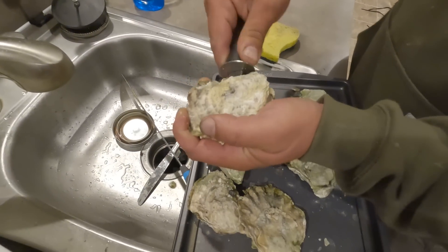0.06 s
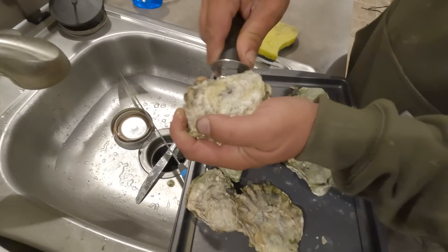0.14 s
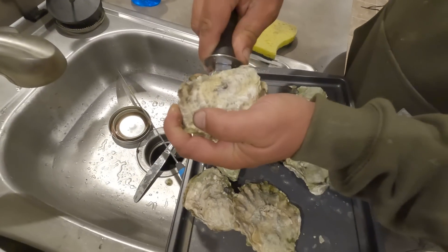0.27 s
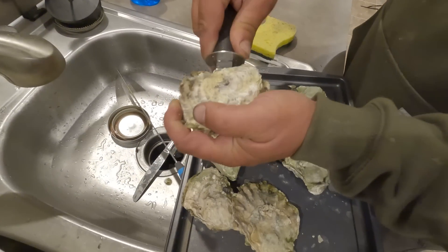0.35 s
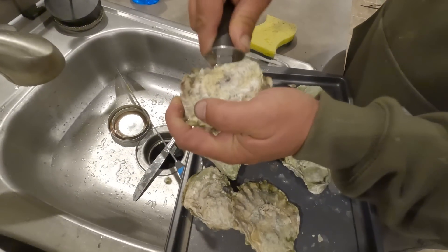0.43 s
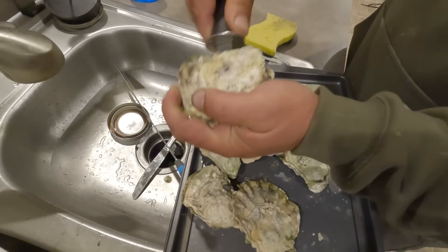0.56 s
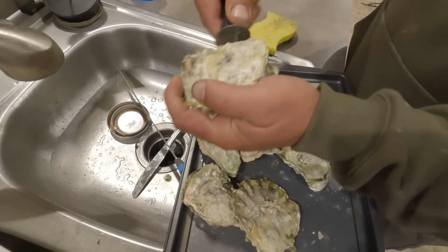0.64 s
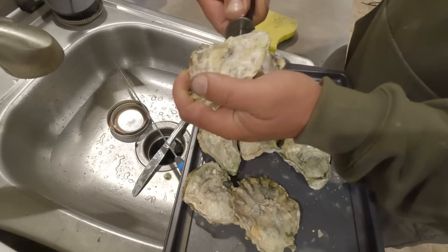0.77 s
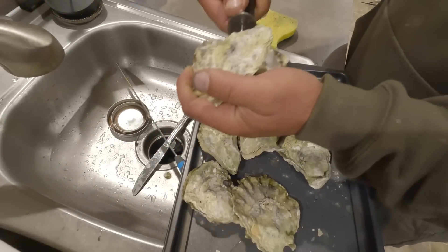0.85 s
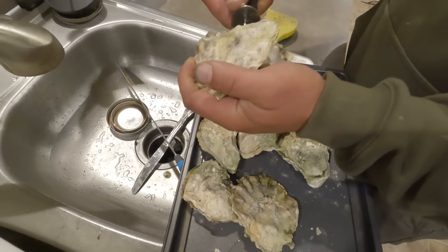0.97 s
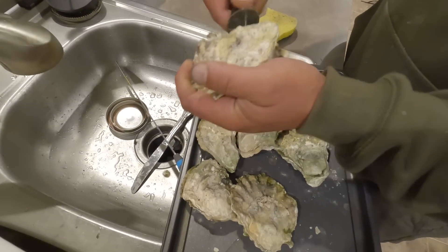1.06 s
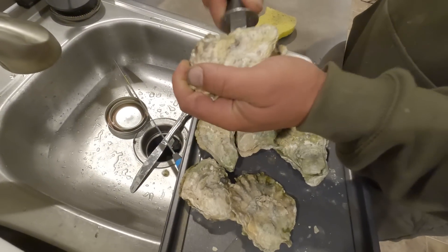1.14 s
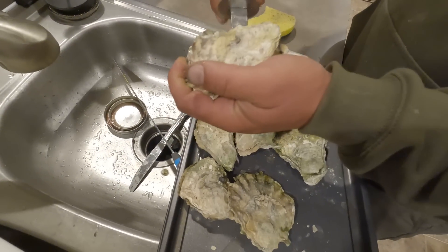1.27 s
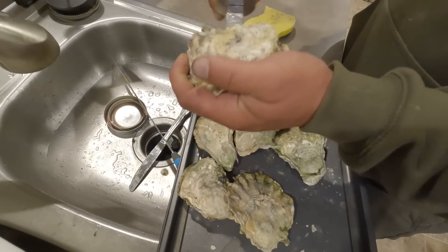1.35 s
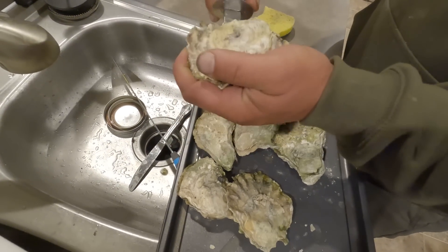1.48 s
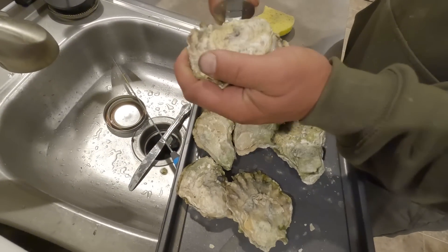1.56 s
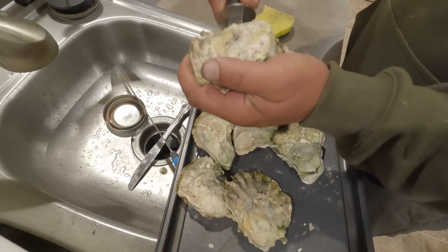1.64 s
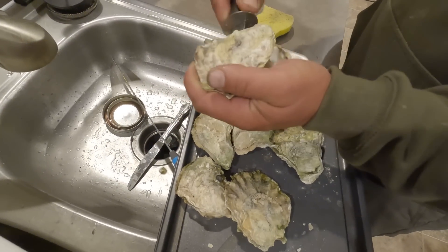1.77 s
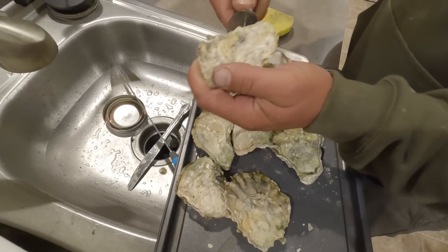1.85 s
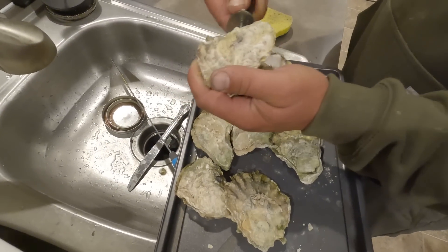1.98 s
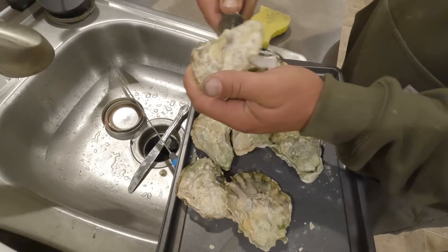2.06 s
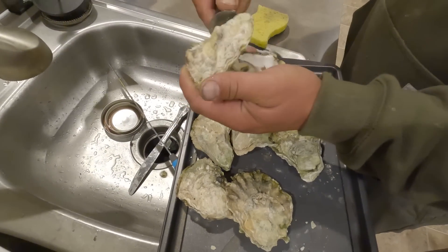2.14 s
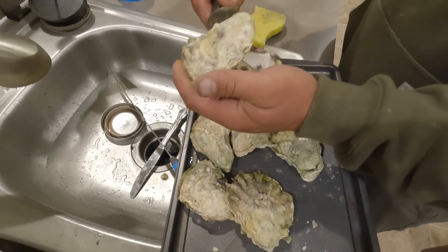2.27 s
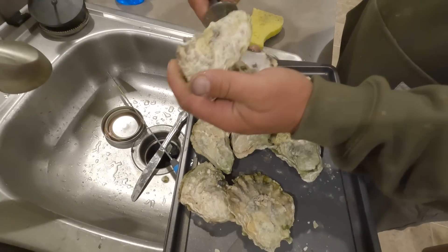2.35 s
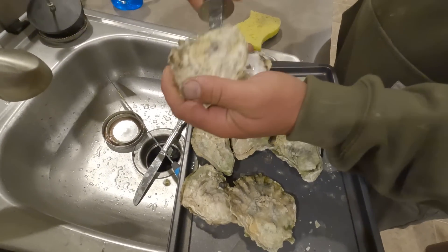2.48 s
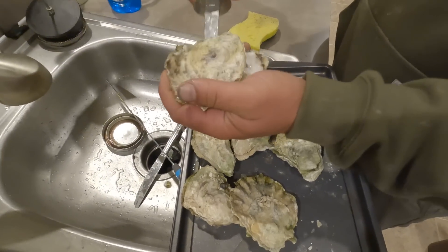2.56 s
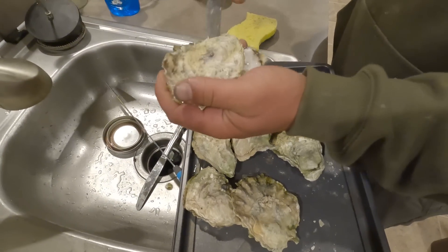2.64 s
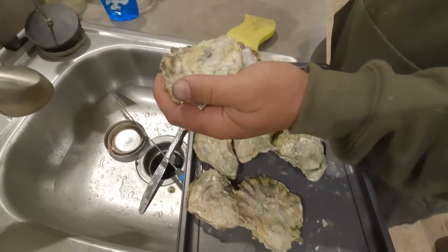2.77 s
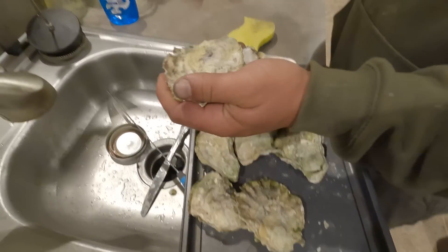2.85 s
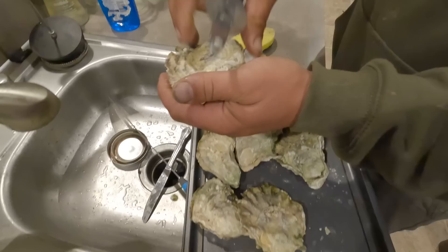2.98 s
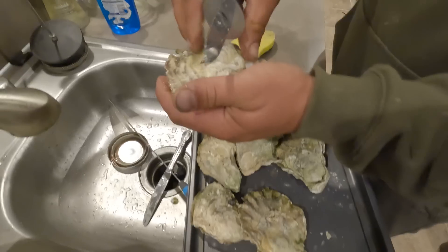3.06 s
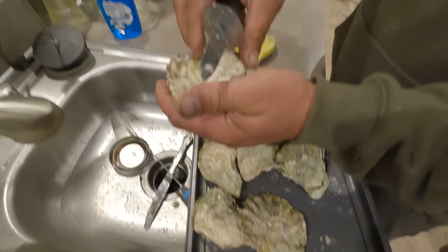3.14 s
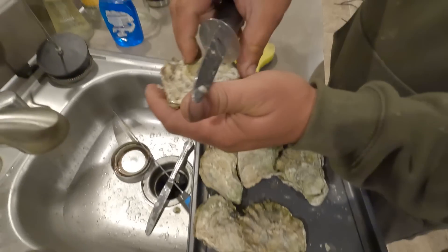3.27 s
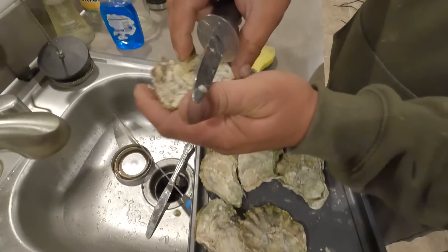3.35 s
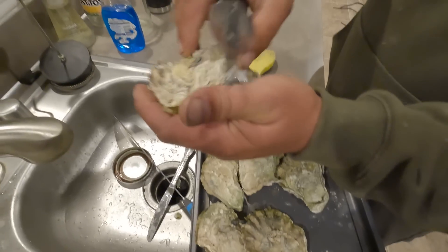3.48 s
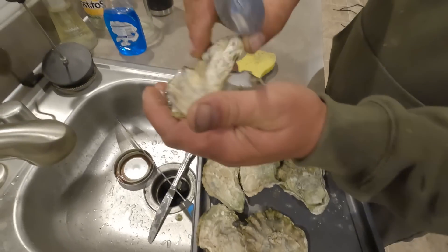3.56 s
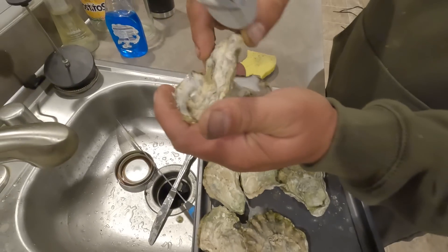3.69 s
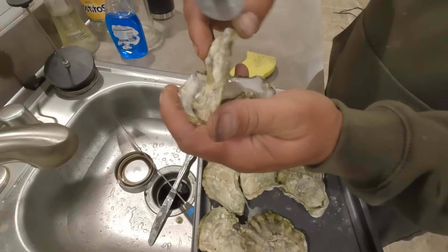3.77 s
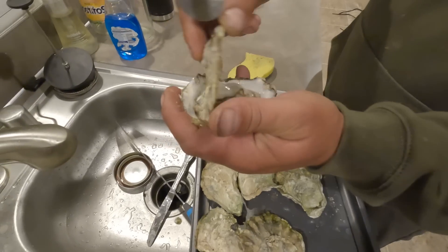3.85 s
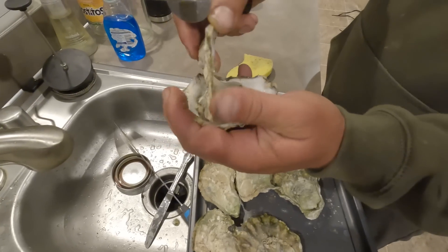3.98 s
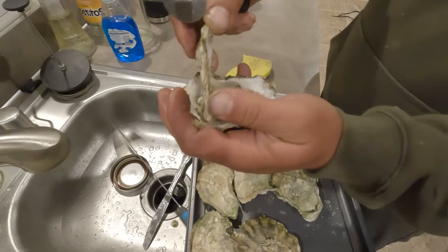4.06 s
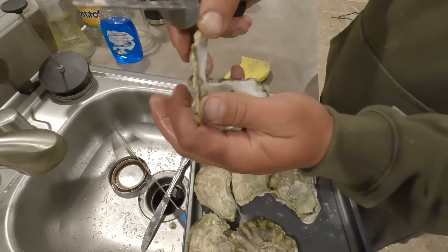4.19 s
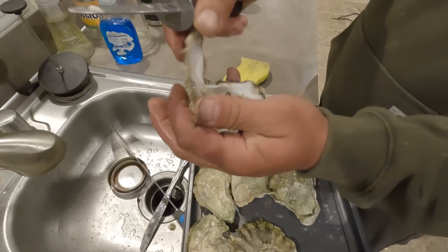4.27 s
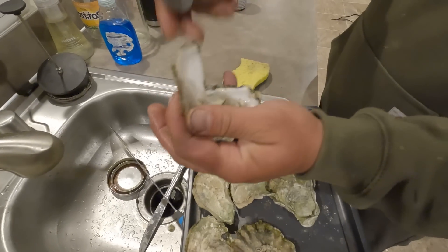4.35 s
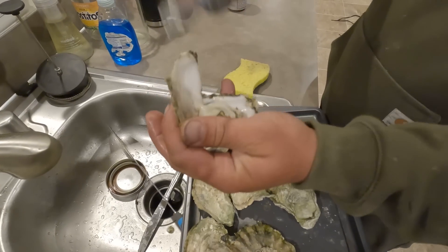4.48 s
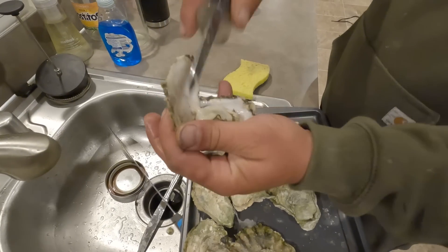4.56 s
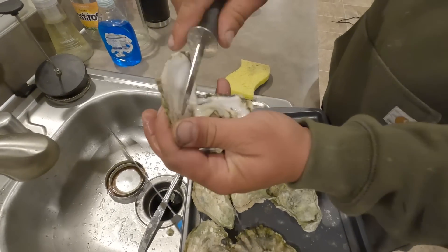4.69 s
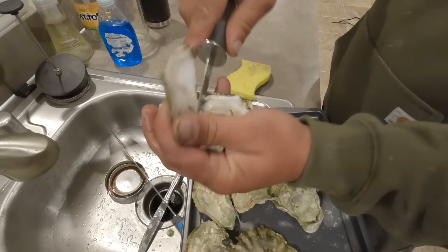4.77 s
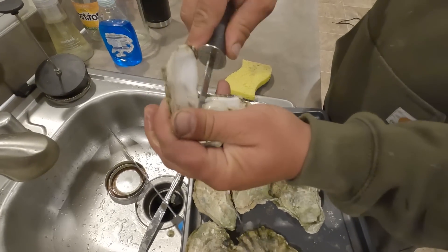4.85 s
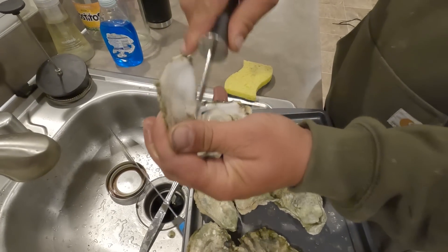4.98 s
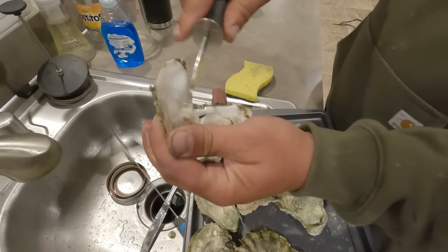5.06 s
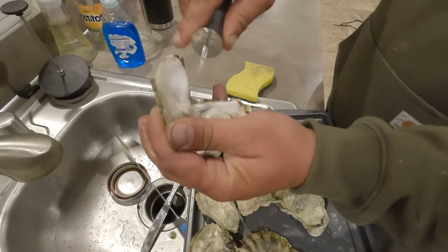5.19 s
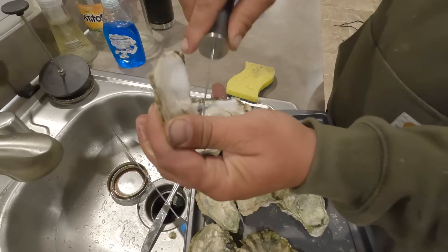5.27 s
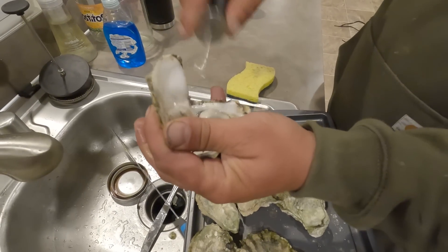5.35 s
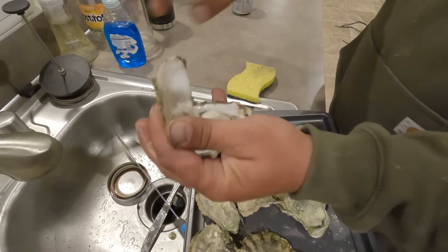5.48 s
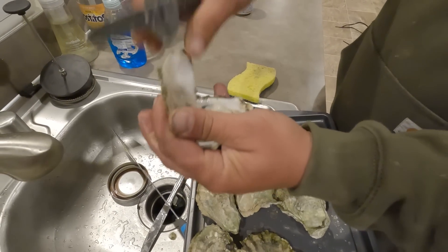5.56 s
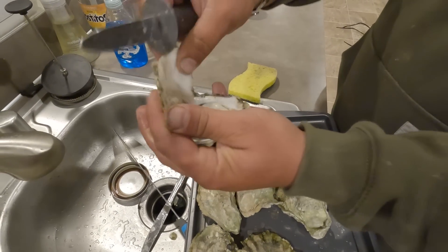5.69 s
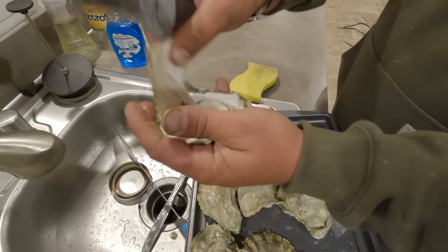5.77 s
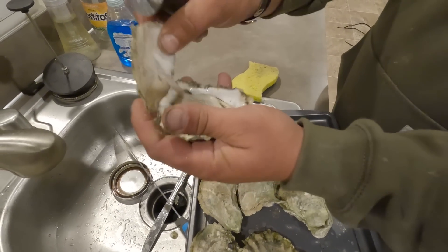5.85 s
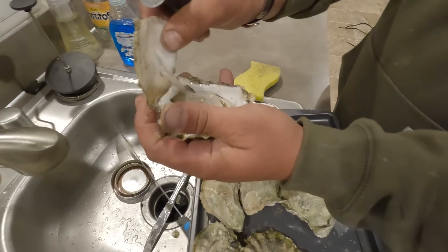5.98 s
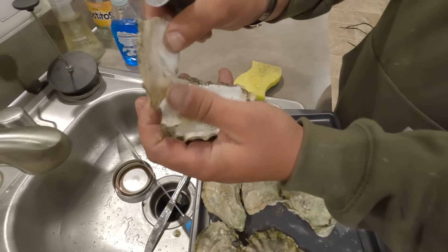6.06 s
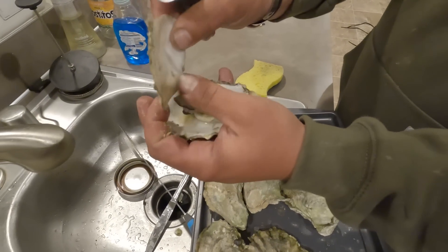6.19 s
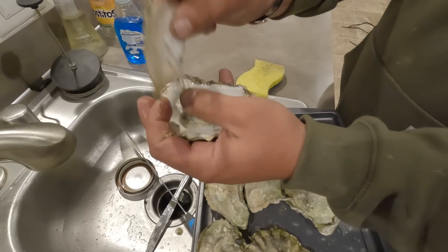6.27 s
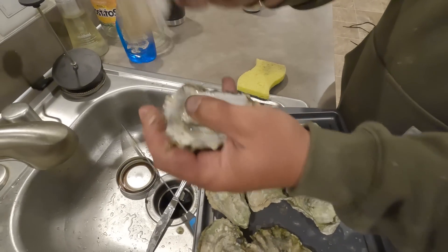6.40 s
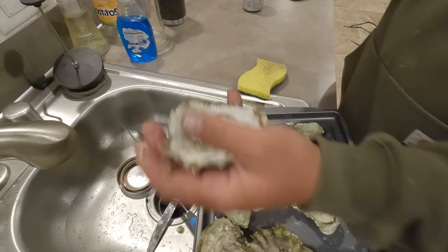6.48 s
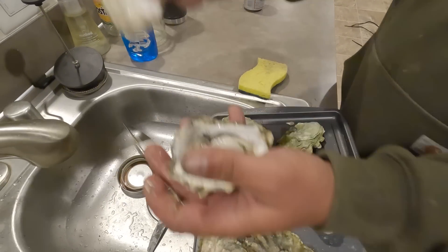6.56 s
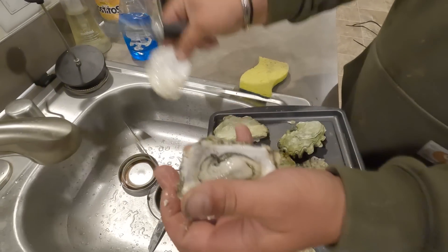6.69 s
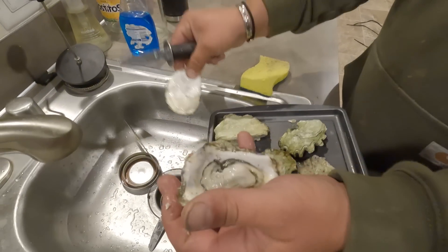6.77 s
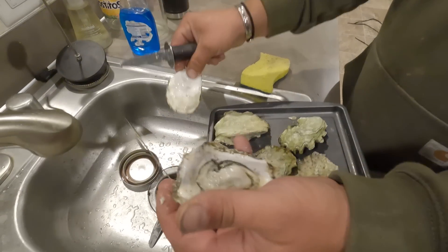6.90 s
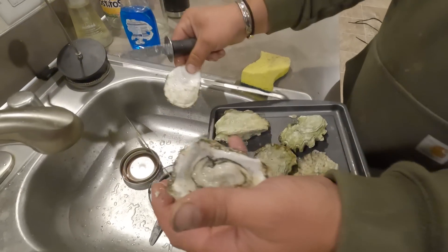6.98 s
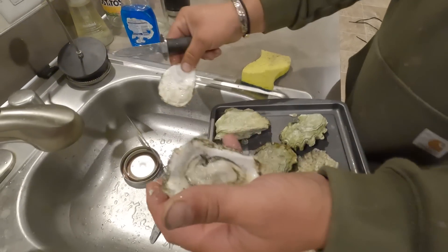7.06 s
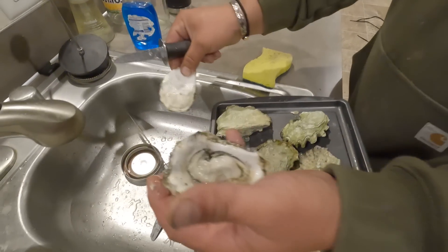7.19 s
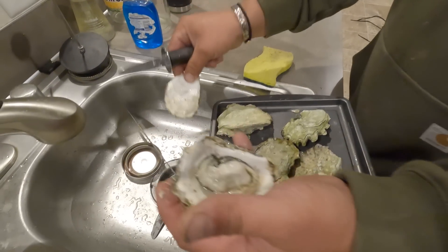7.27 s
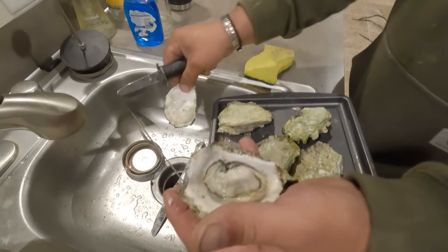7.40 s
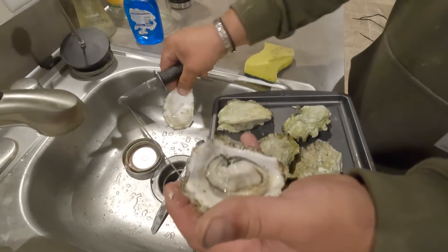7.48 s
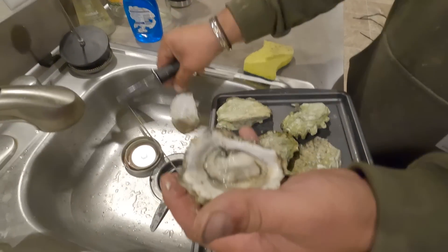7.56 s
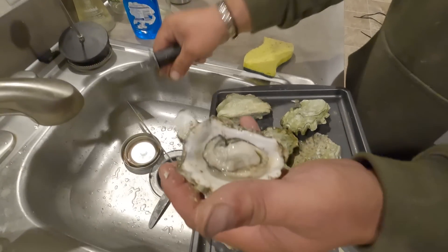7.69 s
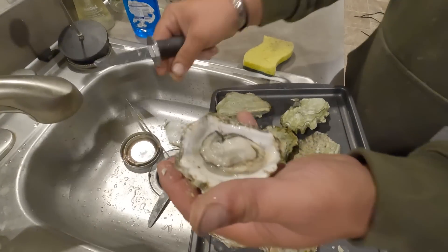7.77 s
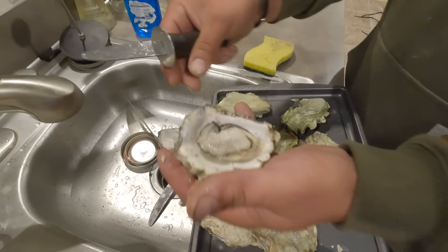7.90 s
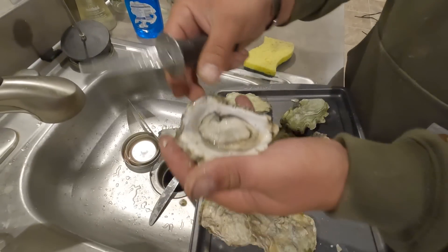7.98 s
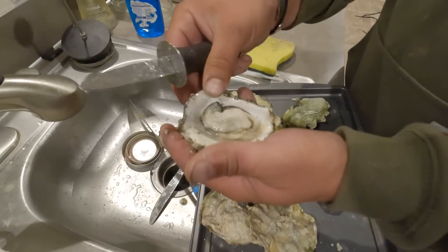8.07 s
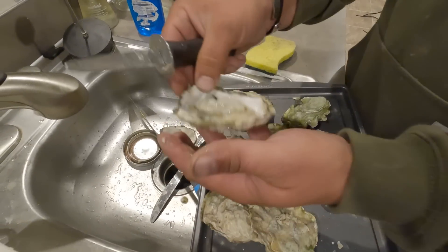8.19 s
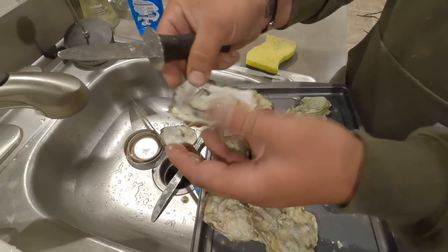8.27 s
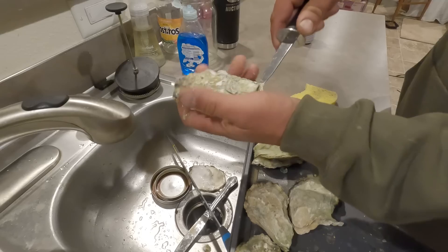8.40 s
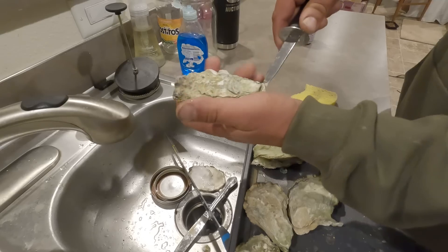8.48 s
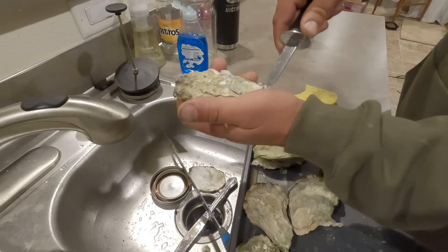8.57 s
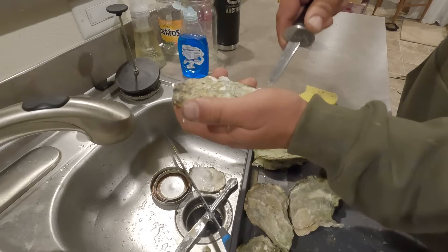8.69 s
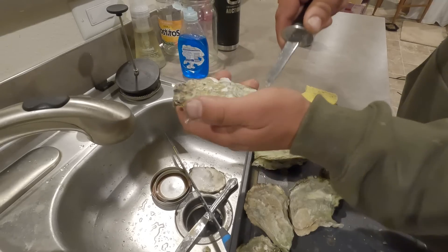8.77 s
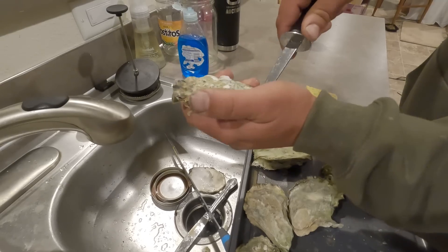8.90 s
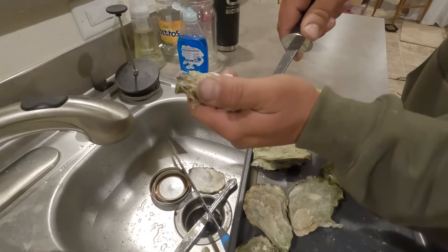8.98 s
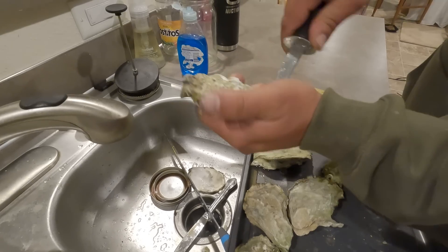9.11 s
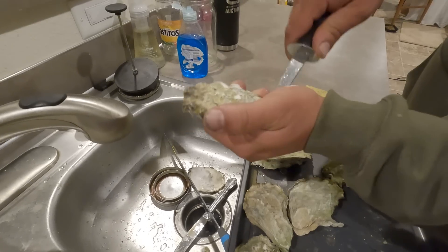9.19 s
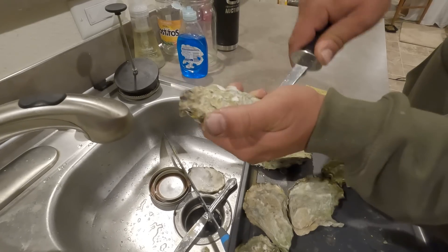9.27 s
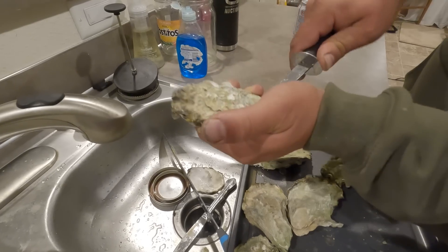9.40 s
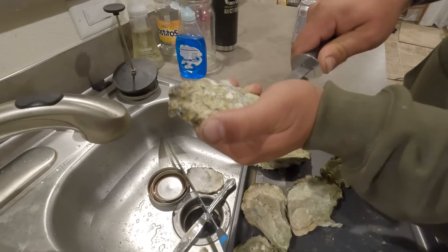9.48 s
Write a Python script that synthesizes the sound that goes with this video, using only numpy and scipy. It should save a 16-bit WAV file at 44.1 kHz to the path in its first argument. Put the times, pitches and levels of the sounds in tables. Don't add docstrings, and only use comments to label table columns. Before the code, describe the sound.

A knife tip cracks and grits at an oyster hinge, loud snaps part the shell, then the loose half clatters into a steel sink.

```python
import sys
import numpy as np
from scipy import signal
from scipy.fft import irfft
from scipy.io import wavfile
from scipy.ndimage import uniform_filter1d

SR = 44100
rng = np.random.default_rng(int(sys.argv[2]) if len(sys.argv) > 2 else 0)


def volts_from_db(level):
    exponent = np.asarray(level, float) / 20
    return 10 ** exponent


def transcribe(u):
    v = np.clip(np.atleast_2d(u).T, -1, 1)
    q = np.round(v * 32767).astype(np.int16)
    wavfile.write(sys.argv[1], SR, q)


N = 420713
T = np.arange(N) / SR
HZ = np.fft.rfftfreq(4096, 1 / SR)


def evened(x):
    return x / np.sqrt(np.mean(x ** 2) + 1e-20)


def read(points, hz):
    f, value = np.transpose(points)
    return np.interp(np.log(hz + 1), np.log(f + 1), value)


def course(points, outside_db):
    s, db = np.transpose(points)
    return volts_from_db(np.interp(T, s, db, outside_db, outside_db))


def add(mix, s, sound):
    part = mix[..., round(s * SR):][..., :sound.shape[-1]]
    part += sound[..., :part.shape[-1]]


def causal(gain):
    log = np.log(np.maximum(np.r_[gain, gain[-2:0:-1]], 1e-5))
    return np.fft.ifft(np.exp(np.conj(signal.hilbert(log)))).real


def modes(peaks):
    return sum(volts_from_db(db) / np.sqrt(1 + (2 * (HZ - hz) / width) ** 2) for hz, width, db in peaks)


def body(spectrum, peaks, between_db):
    broad = volts_from_db(read(spectrum, HZ) + between_db)
    ceiling = np.minimum(volts_from_db(read(spectrum, HZ) + 7.0), 1)
    return broad + modes(peaks) * ceiling


def treble(db):
    return volts_from_db(db / (1 + (5000 / (HZ + 1)) ** 6))


def resonate(x, hz, width):
    turn, r = np.exp(2j * np.pi * hz * T[:len(x)]), np.exp(-np.pi * width / SR)
    return 2 * (turn * signal.lfilter([1 - r], [1, -r], x / turn)).real


def ports(x, other):
    difference = 0.11 * other + 0.17 * np.diff(other, n=2, prepend=[0, 0])
    return x + np.outer([1, -1], difference)


def burst(length_s):
    t = np.arange(2048) / SR
    splinters = rng.standard_normal(2048) * volts_from_db(4.5 * rng.standard_normal(2048))
    decay = np.exp(-t / np.clip(length_s, 1e-4, .02))
    return splinters * decay * np.minimum(t / .0006 + 0.053, 1)


def ringing(shell, hz, treble_db, ring_db, width):
    gain = np.interp(HZ * rng.uniform(.965, 1.035), HZ, shell) * treble(treble_db)
    gain = gain * volts_from_db(2.6 * evened(uniform_filter1d(rng.standard_normal(len(HZ)), 50)))
    spot = volts_from_db(ring_db) * gain.max() * modes([(hz, width, 0)]) ** 2
    return causal(gain + spot)[:2048]


def cracks(rows, shell, length_s, ring_db, width):
    lead_in_s, lead_in_db = 0.0052, -26
    out, lead = np.zeros((2, N)), round(lead_in_s * SR)
    for s, db, hz, treble_db in rows:
        ring = ringing(shell, hz, treble_db, ring_db, width)
        lead_in = volts_from_db(lead_in_db) * np.linspace(0, 1, lead) * rng.standard_normal((2, 512))[:, :lead]
        front = ports(*(np.r_[c, burst(length_s)] for c in lead_in))
        crack = signal.fftconvolve(front, ring[None], axes=1)
        add(out, s - lead / SR, volts_from_db(db) * crack / abs(crack.mean(0)).max())
    return out


def grit(count, per_s, spread_db):
    clumps = volts_from_db(4.5 * evened(uniform_filter1d(rng.standard_normal(count), 130)))
    size = volts_from_db(spread_db * np.minimum(rng.exponential(1, count), 4))
    size = size * rng.choice([-1, 1], count)
    return evened(clumps * size * (rng.random(count) < per_s / SR))


def scrapes(rows, shell, per_s, spread_db):
    out = np.zeros((2, N))
    for s, length_s, db, hz, treble_db in rows:
        count = max(round(1.2 * length_s * SR), 64)
        ring = ringing(shell, hz, treble_db + 10.5, -1.9, 230)
        rub = ports(*(grit(12000, per_s, spread_db)[:count] for port in "ab"))
        rub = rub * signal.windows.tukey(rub.shape[1], .6)
        stroke = signal.fftconvolve(rub, ring[None] / np.linalg.norm(ring), axes=1)
        add(out, s, volts_from_db(db) * stroke)
    return out


# f/Hz, level/dB
HUM = [(35, -42.5), (60, -14.5), (97, -8), (247, -10), (283, -12.5), (381, -18), (561, -30), (886, -34),
       (1190, -25), (1570, -30), (3640, -50), (7060, -47.5), (11900, -57), (15000, -94.5)]
# f/Hz, level/dB
HUM_LINES = [(172.3, -57.5), (236.9, -56.5), (376.8, -69.5)]
# f/Hz, likeness
HUM_LIKENESS = [(60, 0.93), (240, 0.94), (950, 0.74), (3770, 0.25), (15000, 0.92)]
# f/Hz, level/dB
HUM_LEAN = [(60, 2), (240, -0.5), (950, 1), (3770, 1), (15000, 5.5)]


def hum():
    frames, hz = N // 512 + 5, np.fft.rfftfreq(2048, 1 / SR)
    a, b, c, d, patches = rng.standard_normal((frames, 1025, 5)).T
    patches = evened(uniform_filter1d(uniform_filter1d(patches, 20, 0), 8, 1))
    same, left = np.clip(read(HUM_LIKENESS, hz), -1, 1)[:, None], a + 1j * b
    z = np.array([left, same * left + np.sqrt(1 - same ** 2) * (c + 1j * d)])
    lean_db = np.outer([.5, -.5], read(HUM_LEAN, hz))[..., None]
    z *= volts_from_db(read(HUM, hz)[:, None] + 1.2 * patches + lean_db)
    out = volts_from_db(-52.5) * evened(signal.istft(z, nperseg=2048, noverlap=1536)[1][:, :N])
    for f, db in HUM_LINES:
        waver = 0.37 * evened(resonate(rng.standard_normal(N), f, 4.0))
        out = out + volts_from_db(db) * evened(np.sin(2 * np.pi * f * T) + waver)
    return out


# t/s, level/dB
RUMBLE = [(0.0, -47.5), (2.66, -42), (2.95, -50.5), (3.11, -36), (6.24, -45.5), (7.86, -36.5),
          (8.29, -46.5), (8.45, -40.5), (9.54, -39)]
# t/s, peak level/dB
THUMPS = [(0.301, -36.5), (1.7, -31), (1.778, -38), (5.264, -32), (6.069, -37), (6.368, -36.5),
          (7.745, -30.5)]
# t/s, peak level/dB, f/Hz
NUDGE = (8.436, -27.5, 36.4)


def rumble():
    noise = rng.standard_normal((2, N))
    shake = [evened(resonate(resonate(resonate(n, 34.6, 27), 16, 24), 25, 30)) for n in noise]
    knocks, t = np.zeros(N), np.arange(4000) / SR
    thump_hz = 92
    for s, db, hz in [(*row, thump_hz) for row in THUMPS] + [NUDGE]:
        swell = (t * hz / 0.45) * np.exp(1 - t * hz / 0.55)
        add(knocks, s, volts_from_db(db) * np.sin(2 * np.pi * hz * t) * swell)
    both = shake[0] * volts_from_db([[-2.2], [1.8]]) + .08 * shake[1] * np.array([[1], [-1]])
    return course(RUMBLE, None) * both + knocks


# t/s, level/dB
SLEEVE = [(3.1, -74.5), (5.9, -70), (6.2, -90.5), (6.5, -66), (6.77, -63), (6.9, -74), (7.15, -63),
          (7.4, -71), (7.7, -75), (8.2, -85), (8.55, -64), (8.75, -66), (8.9, -72), (9.54, -69)]
# f/Hz, level/dB
CLOTH = [(700, -29.5), (1900, 1), (3300, -12), (5000, -5.5), (8000, -14), (13000, -40)]


def sleeve():
    folds = volts_from_db(1.6 * evened(uniform_filter1d(rng.standard_normal(N), 3000)))
    rustle = signal.oaconvolve(rng.standard_normal(N), causal(volts_from_db(read(CLOTH, HZ))))[:N]
    s, db = np.transpose(SLEEVE)
    return evened(rustle * folds) * volts_from_db(np.interp(T, s, db, -99))


def echoes(x, decay):
    taps = np.zeros((2, SR // 2))
    at = np.arange(200, SR // 2 - 20, 20) + rng.integers(0, 20, (2, (SR // 2 - 201) // 20))
    np.put_along_axis(taps, at, rng.choice([-1., 1.], at.shape), 1)
    taps[1] = 0.63 * taps[0] + .6 * taps[1]
    hz, t, z = signal.stft(taps, SR, nperseg=256)
    tail = signal.istft(z * volts_from_db(-60 * t / read(decay, hz)[:, None]), SR, nperseg=256)[1]
    return signal.fftconvolve(x[None], tail / np.linalg.norm(tail[0]), axes=1)[:, :N]


# f/Hz, t60/s
KITCHEN = [(300, 0.59), (2000, 0.39), (6000, 0.35), (14000, 0.22)]
# f/Hz, t60/s
BASIN = [(300, .5), (1500, 0.5), (5000, 0.54), (12000, 0.052)]


def room(near, blade, dropped):
    kitchen = volts_from_db(-13.0) * echoes(near.mean(0) + 0.67 * blade, KITCHEN)
    return kitchen + volts_from_db(-12.5) * echoes(dropped.mean(0), BASIN)


# f/Hz, level/dB
NEAR_LEAN = [(500, -0.5), (2000, 0), (6000, 1), (13000, 6)]


def placed(sound):
    lag = .4 * np.minimum(HZ / 3000, 1)
    lean = []
    for side in (.5, -.5):
        gain = volts_from_db(side * read(NEAR_LEAN, HZ)) * np.exp(-1j * side * lag)
        lean.append(np.fft.fftshift(irfft(gain)))
    return signal.oaconvolve(sound, np.array(lean), "same", axes=1)


# t/s, peak level/dB, f/Hz
BOUNCES = [(7.8175, -7, 5650), (7.82, -6, 980), (7.833, -9, 1300), (7.847, 2, 1740), (7.857, -11.5, 1720),
           (7.864, -8, 1000), (7.889, -9.5, 1660), (7.893, -5.5, 1660), (7.896, -4.5, 1650),
           (7.913, -3.5, 1660), (7.936, -19, 1660), (7.952, -9, 1660), (7.965, -14, 1250),
           (7.9776, -17, 1300), (8.043, -19, 1350), (8.052, -19.5, 890), (8.058, -25, 3210)]
# t/s, level/dB
RATTLE = [
    (7.795, -50),
    (7.829, -32.5),
    (7.984, -29.5),
    (8.12, -55),
]
# broad colour f/Hz, level/dB; resonances f/Hz, width/Hz, level/dB
STEEL = [
    [(240, -58.5), (400, -16.5), (852, -8), (935, -1.5), (1490, -8), (1650, -6), (2880, -17.5), (7400, -17), (11900, -24.5), (16000, -50.5)],
    [(1127, 19, -6.5), (1300, 20, -8.5), (1660, 53, -8), (2090, 39, -19), (3270, 90, -9), (4050, 110, -12.5), (5030, 110, -15.5), (5760, 120, -18.5), (6960, 150, -16), (7660, 53.7, -22)],
]
# f/Hz, width/Hz, level/dB
BOOM = [(124, 40, 3), (186, 100, -7), (203, 63, -2.5), (250, 35, -13), (343, 46, -8.5)]


def drop():
    steel = body(*STEEL, -2.5)
    boom = causal(modes(BOOM) ** 2 / (1 + (90 / (HZ + 1)) ** 4))
    rocking = ports(grit(N, 6000, 1.5), grit(N, 6000, 1.5)) * course(RATTLE, -99)
    out = signal.oaconvolve(rocking, evened(causal(steel))[None] / 64, axes=1)[:, :N]
    clatter_s, sag_db_per_s = 0.004, 70
    for s, db, hz in BOUNCES:
        ring = ringing(steel, hz, 0.35, 6.3, 60 + hz / 14)
        clatter = signal.fftconvolve(ports(burst(clatter_s), burst(clatter_s)), ring[None], axes=1)
        add(out, s, volts_from_db(db) * clatter / abs(clatter.mean(0)).max())
        boom_db = -6 + 0.35 * db - sag_db_per_s * (s - BOUNCES[0][0])
        add(out, s, volts_from_db(boom_db) * boom / abs(boom).max())
    return out


# t/s, level/dB, f/Hz, t60/s
PINGS = [(7.797, -42.5, 985, 0.13), (2.84, -46, 4480, 0.17), (5.792, -54, 10620, 0.15),
         (5.79, -62, 13200, 0.15), (5.806, -39, 3220, 0.07), (5.806, -44, 4745, 0.11),
         (8.497, -29, 572, 0.062), (9.016, -37.5, 566, 0.045)]
# t/s, level/dB, f/Hz, t60/s
CHIRP = [
    (4.486, -19, 2870, .026),
    (4.486, -25, 5020, .03),
]


def pings():
    out, t = np.zeros(N), np.arange(12000) / SR
    for s, db, hz, t60 in PINGS + CHIRP:
        onset = np.minimum(t / 0.00064, 1)
        add(out, s, volts_from_db(db - 60 * t / t60) * np.sin(2 * np.pi * hz * t) * onset)
    return out


# t/s, level/dB
SQUEAK = [
    (4.3195, -50),
    (4.3245, -19.5),
    (4.3352, -18.5),
    (4.339, -45),
    (4.345, -70),
]
SLIP_DB = [-5.5, 1.5, -19.5, -10.5, -29.5, -31, -28, -30, -26, -33]


def squeak():
    slips_per_s, rise_per_s2 = 1242, 3000
    jitter = uniform_filter1d(uniform_filter1d(rng.standard_normal(N), 90), 90)
    wobble = rise_per_s2 * (T - SQUEAK[1][0]) ** 2 / 2 + .012 * evened(jitter)
    stack = np.zeros(N)
    for k, db in enumerate(SLIP_DB):
        stack -= volts_from_db(db) * np.cos(2 * np.pi * (k + 1) * (slips_per_s * T + wobble))
    gritty = evened(stack) * (1 + .04 * rng.standard_normal(N))
    return gritty * course(SQUEAK, -120)


# broad colour f/Hz, level/dB; resonances f/Hz, width/Hz, level/dB
GAPING = [
    [(240, -40.5), (400, -18), (1580, -7.5), (1990, -14), (2470, -3), (3530, -10), (5520, -9), (11400, -19), (16000, -51.5)],
    [(916, 250, -9), (1360, 270, -19), (2450, 560, 1.5), (4860, 160, -9), (5300, 740, -3), (7300, 460, -7.5), (9900, 300, -11.5)],
]
# t/s, peak level/dB, f/Hz
OPENING = [(3.6535, -35.5, 2370), (3.77, -26.5, 5530), (4.322, -24, 8430), (4.216, -34, 4830),
           (4.2267, -26.5, 2460), (5.093, -37, 7000), (5.4277, -35, 4300), (5.7802, -25, 2600),
           (5.7883, -21, 2300), (6.451, -42.5, 3100),
           (3.1643, -49.5, 5100), (3.212, -45, 2750), (3.2272, -41.5, 2390), (3.245, -44, 5000),
        (3.2761, -45, 2640), (3.336, -48.5, 2750), (3.4926, -35.5, 2720), (3.5373, -36, 1150),
        (3.6789, -32.5, 4840), (3.974, -50, 4910), (4.0034, -53.5, 2500), (4.0384, -45, 7000),
        (4.0919, -37, 3010), (4.1177, -34, 4650), (4.1716, -49.5, 1580), (4.2793, -39, 1690),
        (4.2988, -46, 2330), (4.4484, -34, 2310), (6.776, -49, 2600), (6.899, -52, 1500)]
# t/s, peak level/dB, f/Hz
KNOCKS = [(4.2369, -18, 4750), (5.3146, -20.5, 2930), (5.464, -41, 2300), (5.8054, -32, 3170),
          (7.391, -45, 2456)]
TICKS = [5.9409, 6.667, 6.8319, 7.702]
# t/s, peak level/dB, f/Hz
TURNING = [(8.492, -23.5, 570), (8.495, -28, 550), (8.633, -33, 578), (8.828, -35, 5300),
           (9.009, -24.5, 5600), (9.032, -24, 5350), (9.121, -37.5, 516), (9.47, -40, 5840)]
# t/s, length/s, pressure level/dB, f/Hz
STROKES = [(3.189, 0.065, -58.5, 5000), (3.481, 0.026, -46.5, 7300), (3.513, 0.04, -48.5, 2830),
           (3.663, 0.036, -43, 4860), (3.754, 0.025, -52, 5660), (4.069, 0.073, -45, 4580),
           (4.205, 0.039, -42, 4700), (4.418, 0.015, -36, 2260), (4.438, 0.059, -41.5, 5000),
           (4.519, 0.019, -48, 2800), (5.764, 0.065, -53, 2280), (6.429, 0.028, -57.5, 7050),
           (7.598, 0.028, -58, 3014), (8.038, 0.023, -32, 1280), (8.801, 0.032, -52, 5383),
           (9.278, 0.049, -55, 1790)]


def open_shell():
    gaping, palm = body(*GAPING, 0.71), volts_from_db(read(GAPING[0], HZ))
    sharp_db, blunt_db, stroke_db = 4, -14, -8
    blows = [(*row, sharp_db) for row in OPENING] + [(*row, blunt_db) for row in KNOCKS]
    blows += [(s, -51, 7000, 17.5) for s in TICKS]
    out = cracks(blows, gaping, 0.0027, -1.0, 450)
    out += cracks([(*row, -4.5) for row in TURNING], palm, 0.0053, -0.95, 430)
    return out + scrapes([(*row, stroke_db) for row in STROKES], gaping, 12000, 1.5)


# t/s, peak level/dB; rings of the spot f/Hz, width/Hz, level/dB
SNAPS = [
    ((2.819, -12.5), [(2140, 160, -4), (2790, 90, 6), (3620, 82, -14), (4130, 77, -6), (5170, 130, 3), (7560, 260, -21)]),
    ((4.8347, -9), [(2570, 92, -2), (3500, 110, -9.5), (5400, 100, 1), (6720, 180, -13), (7750, 140, -17), (8650, 100, -10.5), (8960, 98, -11.5)]),
    ((4.902, -7.5), [(1350, 120, -7.5), (2380, 190, -1), (4360, 110, -5), (5380, 230, -3), (7200, 86, -9), (7740, 110, -5), (8690, 110, -8.5)]),
    ((4.958, -3.5), [(1600, 270, -8), (2346, 190, 2), (3170, 130, -6), (4000, 270, -13.5), (4810, 110, -12), (5450, 98, -20.5), (6260, 140, -22.5)]),
    ((5.3001, -5), [(1320, 99, -12.5), (2220, 120, -5.5), (3550, 120, -3), (4450, 140, -8.5), (5080, 74, -7), (5530, 160, 3), (6960, 110, -13), (7860, 94, -8.5)]),
]


def snaps():
    out = np.zeros((2, N))
    for (s, db), rings in SNAPS:
        blow = .5 * ports(burst(.0026), burst(.0026))
        blow[:, 12] += 5.0
        spot = sum(modes([(hz, 3.0 * width, d / 2)]) ** 2 for hz, width, d in rings)
        ring = causal(spot + volts_from_db(read(GAPING[0], HZ) - 12.0))
        snap = signal.fftconvolve(blow, ring[None], axes=1)
        add(out, s, volts_from_db(db) * snap / abs(snap.mean(0)).max())
    return out


# t/s, length/s, level/dB, rings f/Hz
CREAKS = [
    (1.13, .1, -48, [700, 1500]),
    (1.25, .09, -48, [750, 1000]),
    (2.2, .13, -52, [900, 1300]),
]


def creak():
    out = np.zeros(N)
    for s, length_s, db, rings in CREAKS:
        slips = grit(round(length_s * SR), 900, 2.5)
        groan = sum(resonate(resonate(slips, hz, 90), hz, 90) for hz in rings)
        add(out, s, volts_from_db(db) * evened(groan) * np.hanning(len(groan)))
    return out


# t/s, pressure level/dB
GRINDING = [
    (0.0, -61),
    (1.66, -52),
    (2.05, -64),
    (3.05, -81),
]


def grinding(shell):
    ring = causal(shell * treble(7.1))
    grains = grit(N, 1800, 3.2) * course(GRINDING, -99)
    return signal.oaconvolve(grains, ring / np.linalg.norm(ring))[:N]


# broad colour f/Hz, level/dB; resonances f/Hz, width/Hz, level/dB
SHUT = [
    [(240, -53), (400, -22.5), (1580, -2), (2150, -3.5), (3070, -2), (3530, -10), (7510, -19.5), (12100, -31), (16000, -60.5)],
    [(1708, 85, -34.5), (2200, 56, 5.5), (3526, 92, 5.5), (3900, 170, -19), (5100, 420, 0.5), (6070, 120, -24), (8430, 92, -52)],
]
# t/s, peak level/dB, f/Hz, treble level/dB
PRYING = [(0.0604, -15, 1000, -13), (0.0701, -10, 2180, -9.5), (0.2689, -12.5, 1960, -10.5),
          (0.356, -27.5, 3550, -6.5), (0.723, -15, 2090, -5), (0.7404, -26, 2070, -45),
          (0.7614, -14.5, 3420, -5), (0.7844, -27, 3660, -8), (0.8259, -21.5, 2060, -29),
          (0.8746, -9.5, 2110, -12), (0.8822, -14, 2100, -15), (0.91, -19, 2220, -7.5),
          (1.0958, -18, 2650, -1.5), (1.2091, -13, 2480, -14), (1.3096, -15, 4900, -9.5),
          (1.3759, -16.5, 2180, -19), (1.5196, -18, 2110, -3), (1.6329, -15.5, 2930, -11.5),
          (1.7446, -25.5, 2170, -1), (1.7847, -18, 2120, -4), (1.9944, -23.5, 2080, -26),
          (2.5493, -27, 5030, -12), (2.8378, -16, 2150, -14), (2.2828, -27, 1680, -37),
          (2.2927, -26, 1670, -43), (2.8751, -25.5, 2720, 1)]
# t/s, peak level/dB
CHIPS = [(0.0134, -28.5), (0.2942, -27.5), (0.326, -29.5), (0.424, -39), (0.4726, -32), (0.4978, -31.5),
         (0.527, -29.5), (0.5424, -30), (0.5651, -33.5), (0.5896, -28.5), (0.7189, -22.5), (0.7734, -40.5),
         (0.8314, -28), (1.039, -22), (1.0659, -32), (1.1834, -38), (1.2373, -27.5), (1.448, -35),
         (1.707, -29.5), (1.8158, -28), (2.139, -39.5), (2.2057, -42), (2.619, -27.5), (2.5115, -32),
         (2.8042, -35.5)]
# t/s, peak level/dB, f/Hz
FLAKES = [(0.0266, -30, 2030), (0.036, -27, 1980), (0.2526, -39, 2100), (0.3773, -32, 2230),
          (0.6205, -31, 2700), (0.642, -33, 1300), (0.6684, -36, 2210), (0.6928, -35, 3300),
          (0.7295, -17.5, 2700), (0.848, -24, 1700), (0.855, -27, 1900), (0.866, -22, 4600),
          (0.8791, -11.5, 2200), (0.9953, -26.5, 2280), (1.05, -31, 2200), (1.091, -29, 3000),
          (1.14, -35, 2220), (1.2702, -26.5, 3800), (1.283, -28, 2100), (1.4004, -33, 3040),
          (1.4264, -35, 3160), (1.461, -38, 2200), (1.5075, -26, 5170), (1.6164, -29.5, 2140),
          (1.6816, -28, 2500), (1.8674, -37.5, 2160), (1.951, -37, 2160), (2.0365, -31, 2170),
          (2.1762, -38, 2110), (2.246, -29, 1900), (2.257, -27, 2000), (2.4648, -40, 5750),
          (2.541, -35, 2000), (2.6556, -33, 3080), (2.7628, -34, 5400)]
# t/s, length/s, pressure level/dB
SCRAPES = [(0.018, 0.036, -38), (0.075, 0.11, -54), (0.271, 0.046, -42), (0.524, 0.01, -48.5),
           (0.602, 0.044, -43.5), (0.722, 0.032, -33), (0.764, 0.021, -29), (0.81, 0.068, -34.5),
           (0.991, 0.015, -38), (1.038, 0.009, -49), (1.118, 0.029, -52.5), (1.217, 0.028, -35),
           (1.262, 0.022, -37.5), (1.385, 0.048, -51.5), (1.498, 0.057, -38.5), (1.609, 0.049, -35.5),
           (1.667, 0.033, -44), (1.938, 0.1, -42.5), (2.174, 0.1, -38), (2.268, 0.1, -50),
           (2.398, 0.085, -57), (2.513, 0.08, -49), (2.609, 0.045, -39), (2.659, 0.04, -36),
           (2.758, 0.034, -47.5)]


def hinge():
    gives_s, stretch, hinge_hz, chip_treble_db, grit_treble_db = 2.265, 1.43, 2084, -12, 0
    shut = body(*SHUT, -0.91)
    loose = body(SHUT[0], [(hz * stretch, width * 2, db) for hz, width, db in SHUT[1]], -0.7)
    out = np.zeros((2, N)) + creak() + grinding(shut)
    stages = [(shut, hinge_hz, False, 4000, 1.8), (loose, hinge_hz * stretch, True, 9000, 1.2)]
    for shell, hz, late, grains_per_s, spread_db in stages:
        blows = PRYING + [(*row, hz, chip_treble_db) for row in CHIPS]
        blows = blows + [(*row, chip_treble_db) for row in FLAKES]
        blows = [row for row in blows if (row[0] > gives_s) == late]
        strokes = [(*row, hz, grit_treble_db) for row in SCRAPES if (row[0] > gives_s) == late]
        out += cracks(blows, shell * treble(18.7), 0.0033, 1.0, 250)
        out += scrapes(strokes, shell, grains_per_s, spread_db)
    return out


def scene():
    near = (hinge() + snaps() + open_shell() + sleeve()) * volts_from_db([[-.6], [.6]])
    blade, dropped = squeak() + pings(), drop()
    direct = near + blade + dropped * volts_from_db([[.4], [-.4]])
    return placed(direct + room(near, blade, dropped)) + hum() + rumble()


def roll_off(x):
    return signal.sosfilt(signal.butter(12, 16560, fs=SR, output="sos"), x)


# lead t/s, level/dB
EARLY_COPIES = [
    (0.0117, -37),
    (0.023, -46),
]


def record(dry):
    power_db = 10 * np.log10(abs(uniform_filter1d((dry ** 2).mean(0), 900)) + 1e-12)
    fall = T * 9.0
    over_db = np.maximum(np.maximum.accumulate(power_db + fall) - fall + 14.5, 0)
    ducked = dry / volts_from_db(0.93 * uniform_filter1d(over_db, 600))
    ducked = ducked + sum(volts_from_db(db) * np.roll(ducked, -round(s * SR), 1) for s, db in EARLY_COPIES)
    low_pass = signal.firwin(255, 15800, fs=SR)
    limited = signal.oaconvolve(ducked, low_pass[None], "same", axes=1)
    return roll_off(limited)


dry = scene()
out = record(dry)
transcribe(out)
```